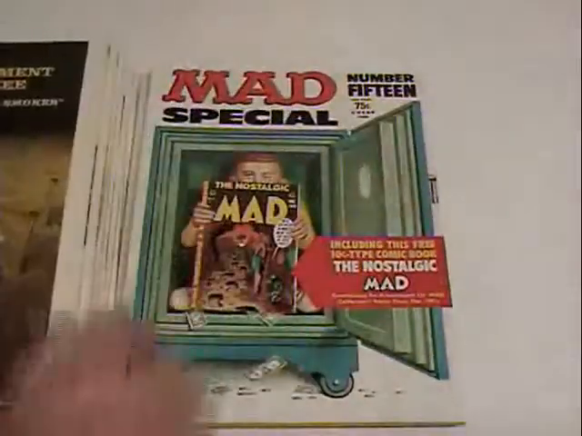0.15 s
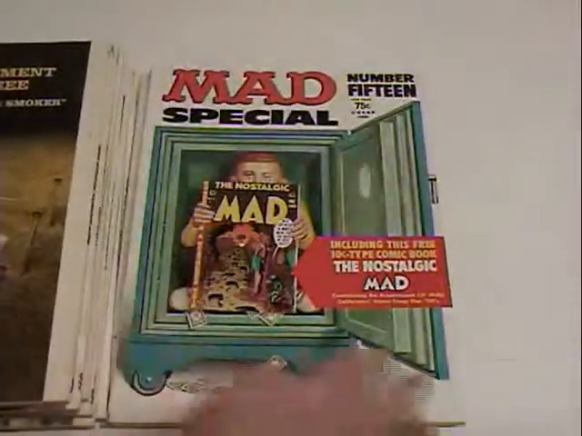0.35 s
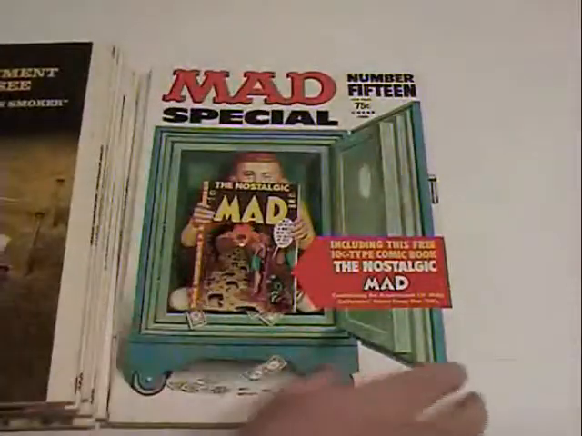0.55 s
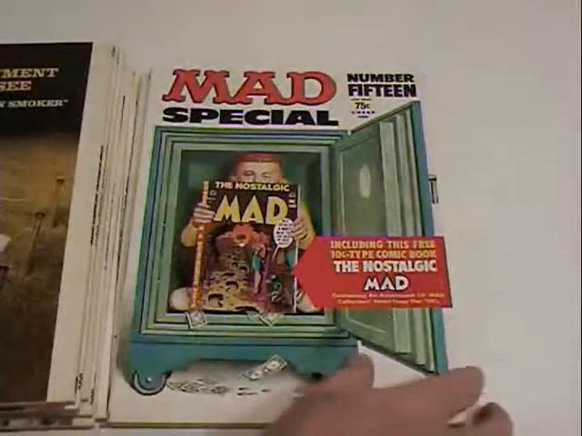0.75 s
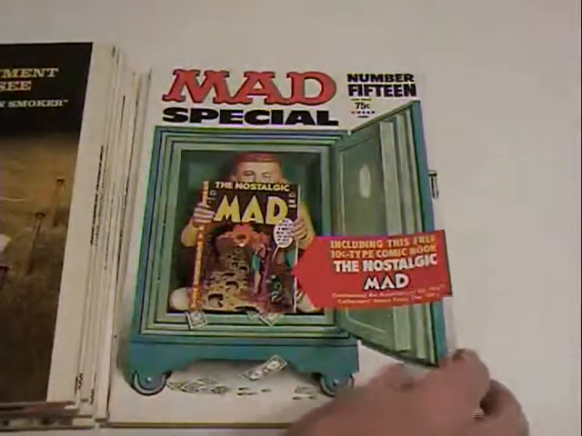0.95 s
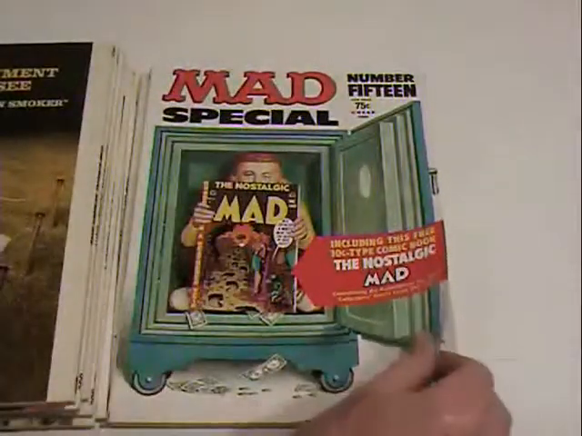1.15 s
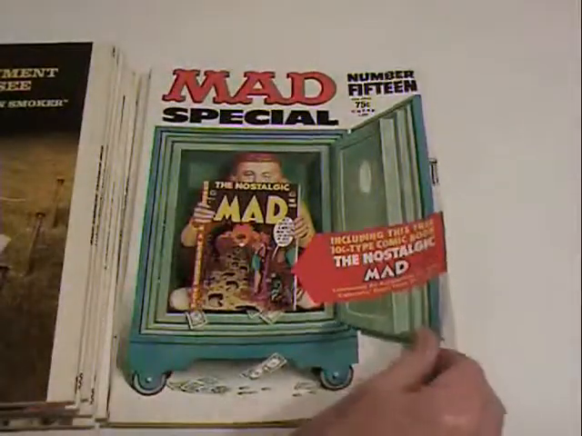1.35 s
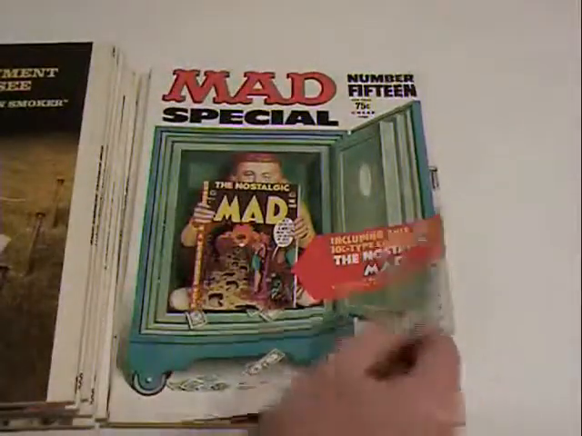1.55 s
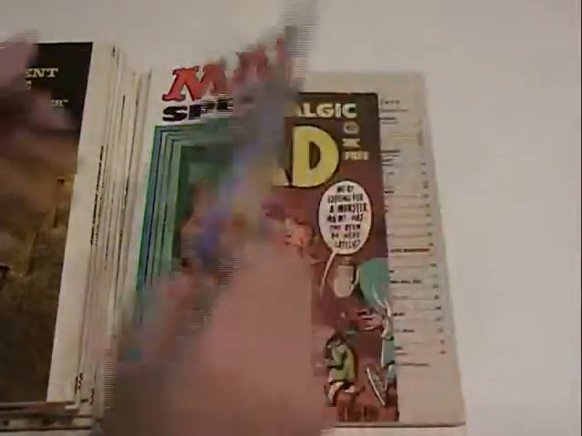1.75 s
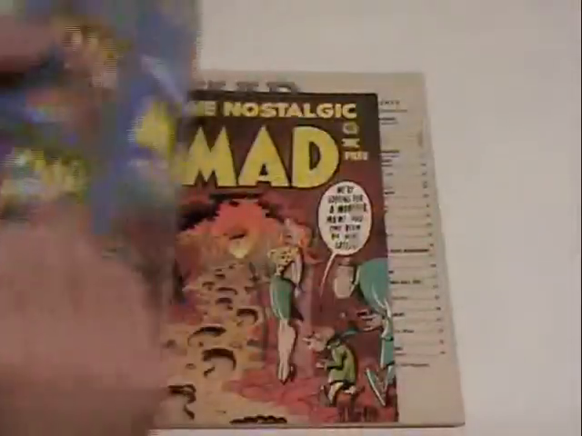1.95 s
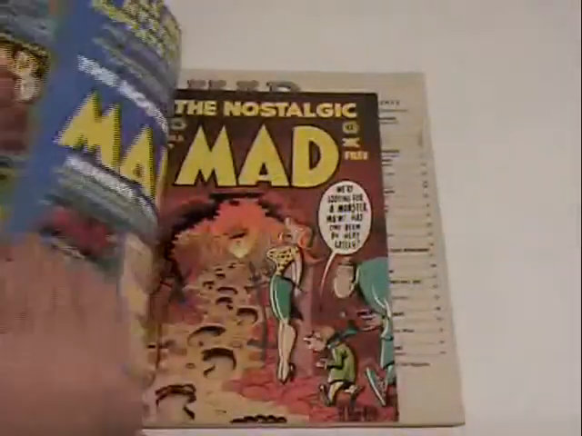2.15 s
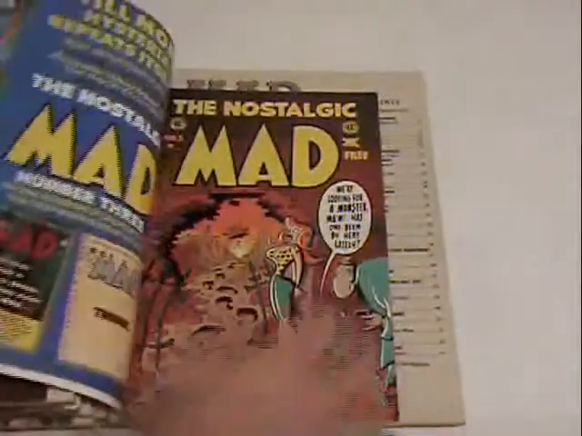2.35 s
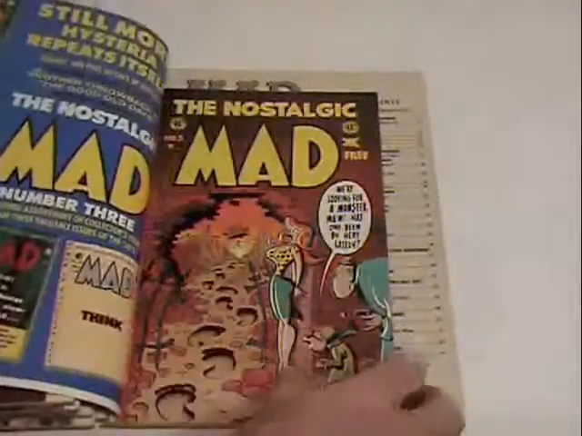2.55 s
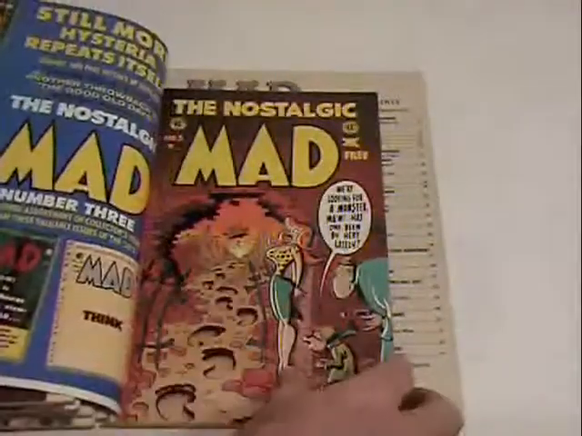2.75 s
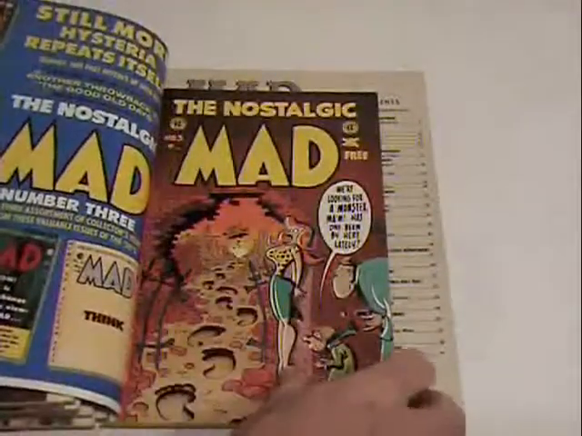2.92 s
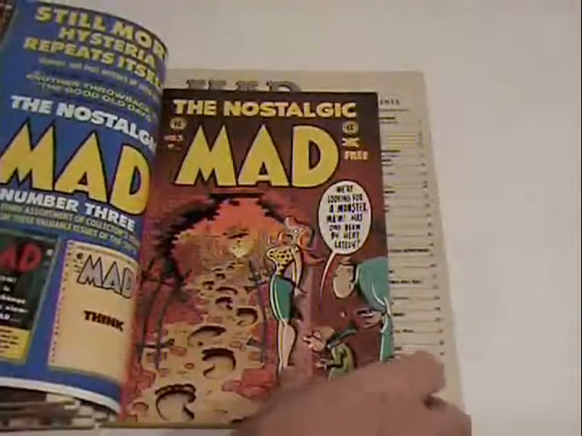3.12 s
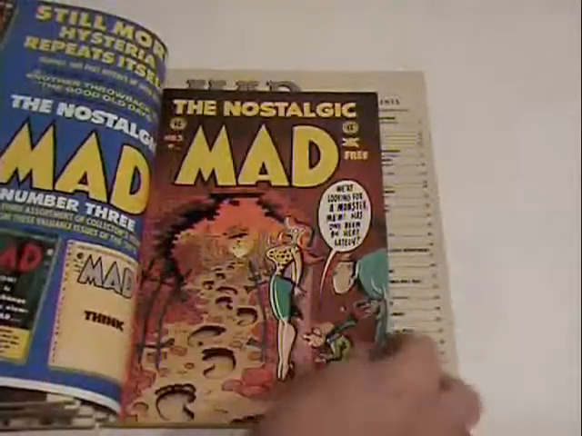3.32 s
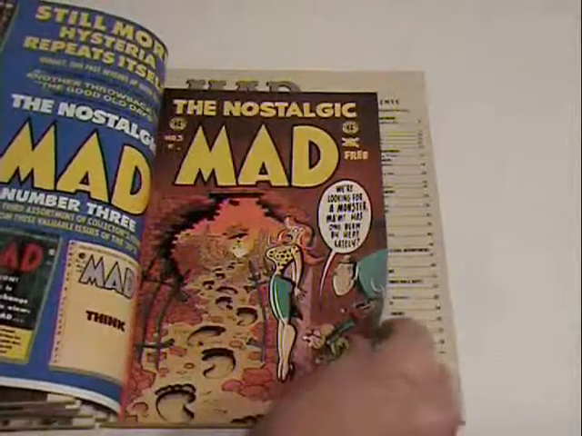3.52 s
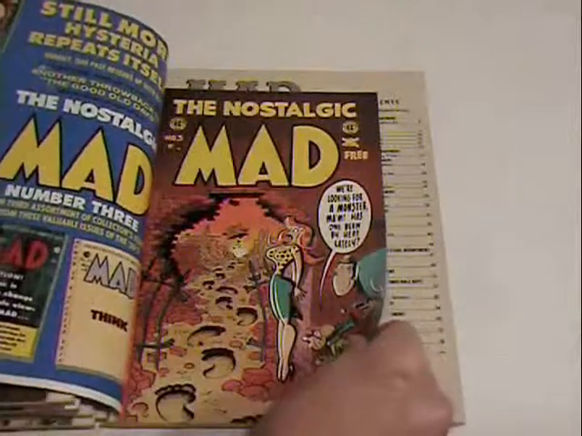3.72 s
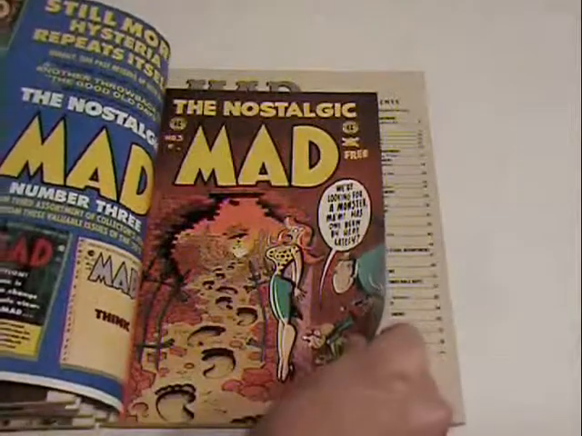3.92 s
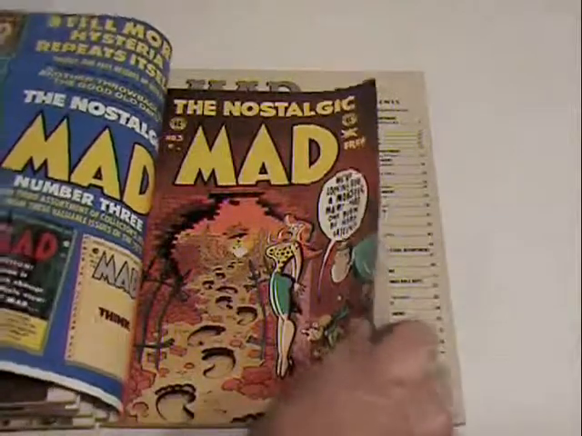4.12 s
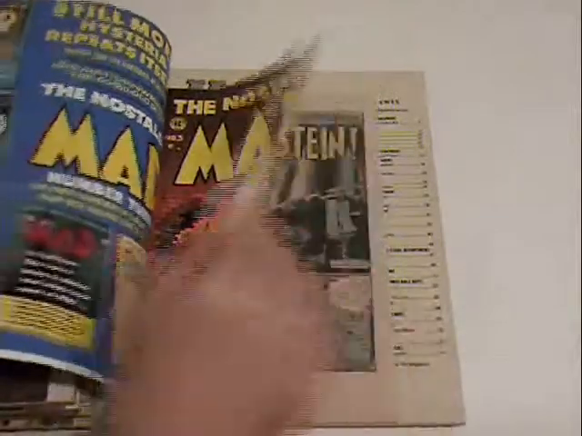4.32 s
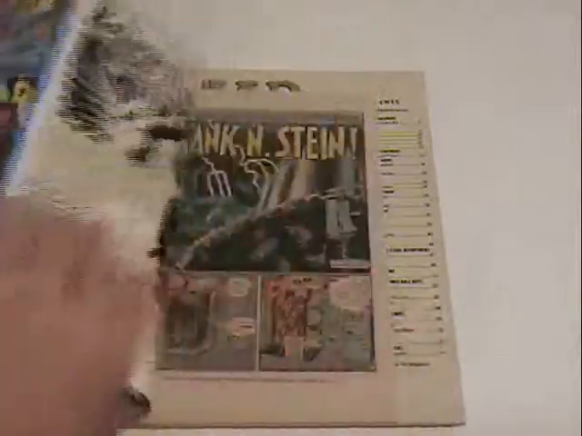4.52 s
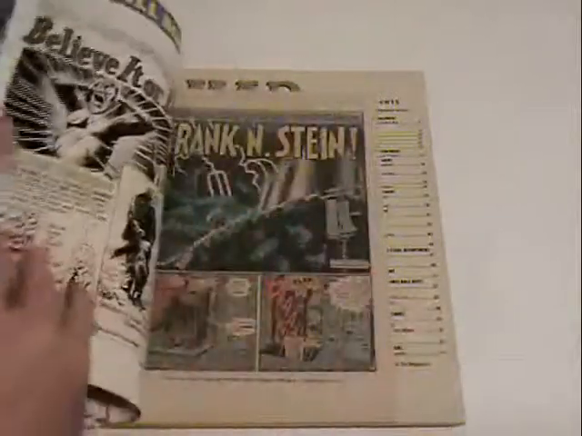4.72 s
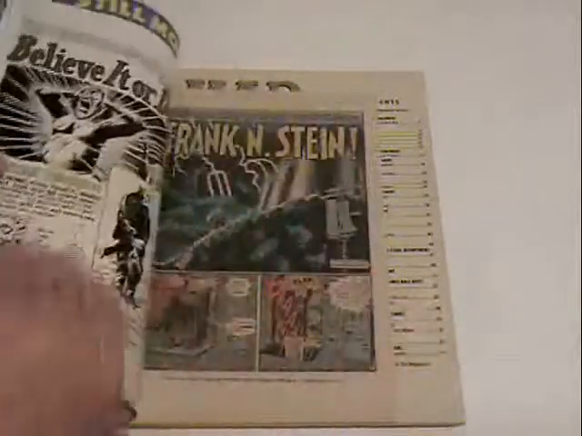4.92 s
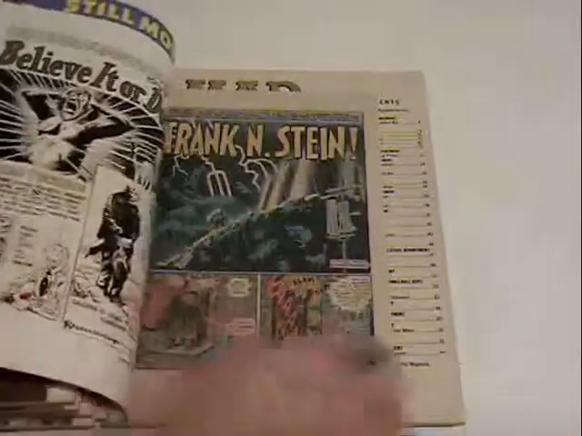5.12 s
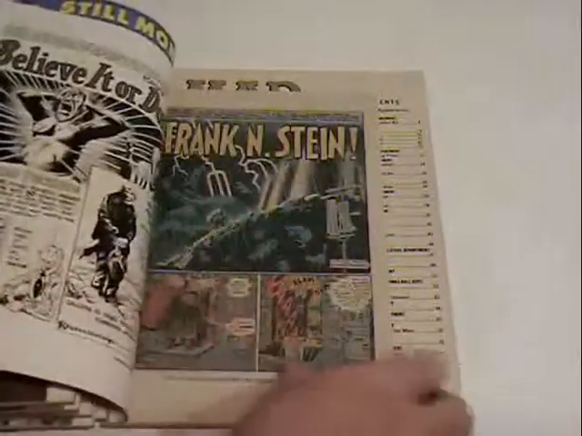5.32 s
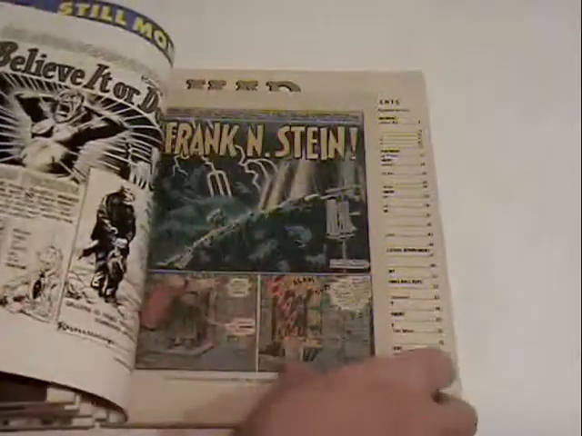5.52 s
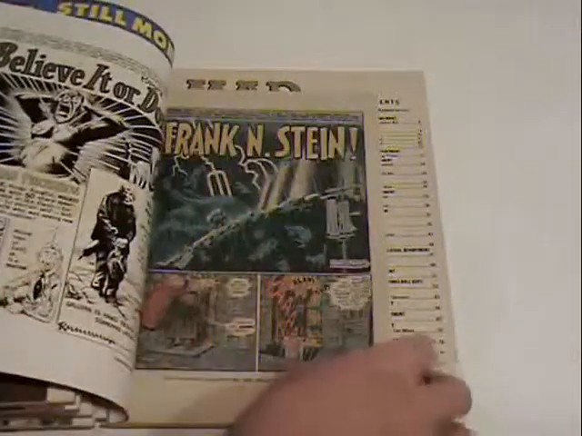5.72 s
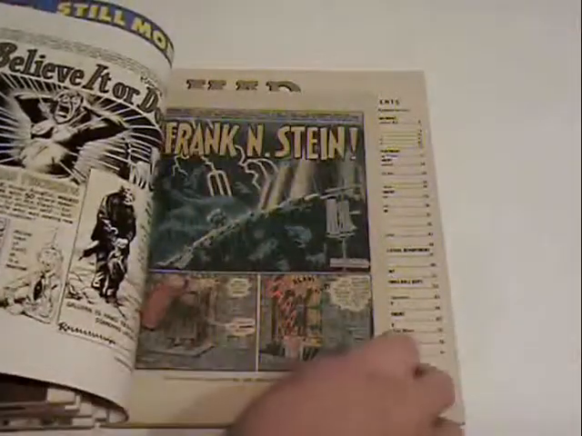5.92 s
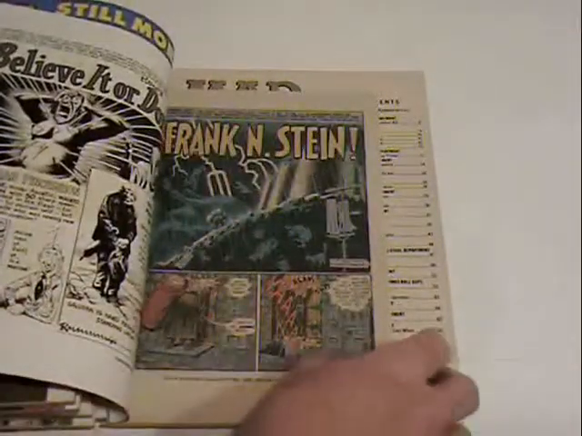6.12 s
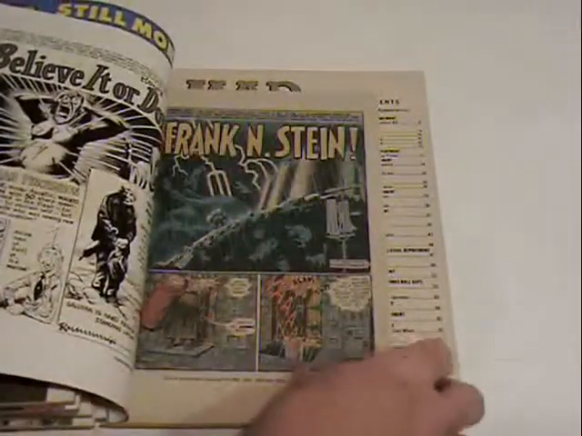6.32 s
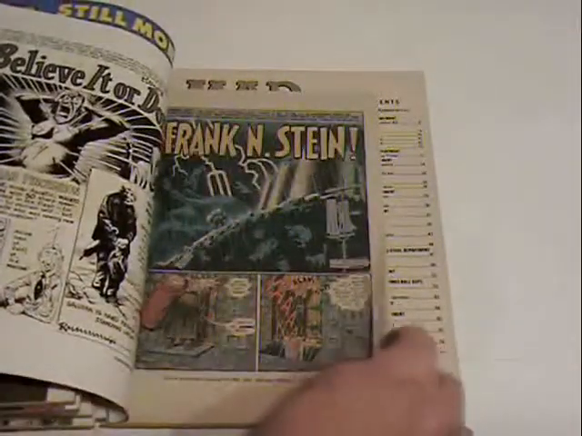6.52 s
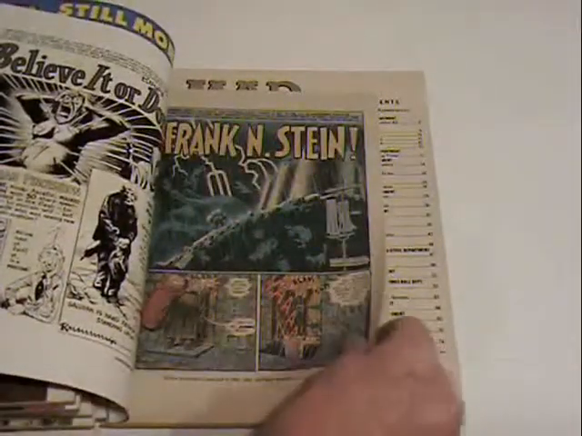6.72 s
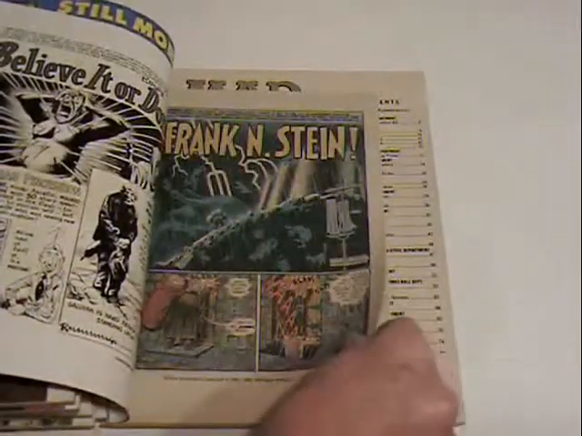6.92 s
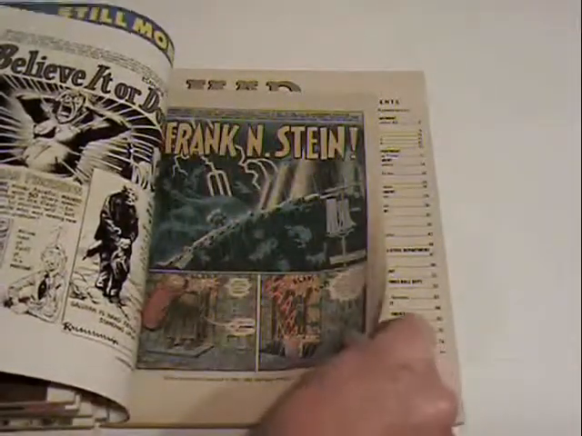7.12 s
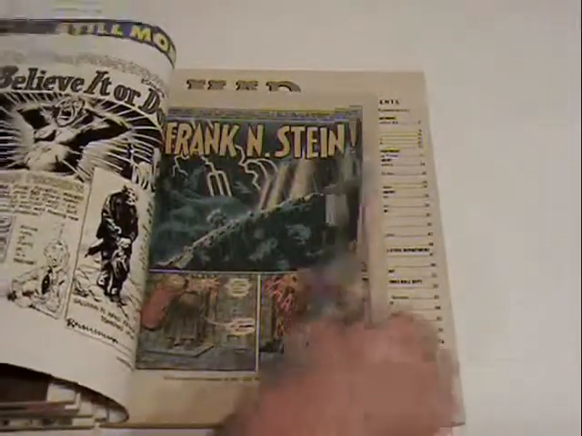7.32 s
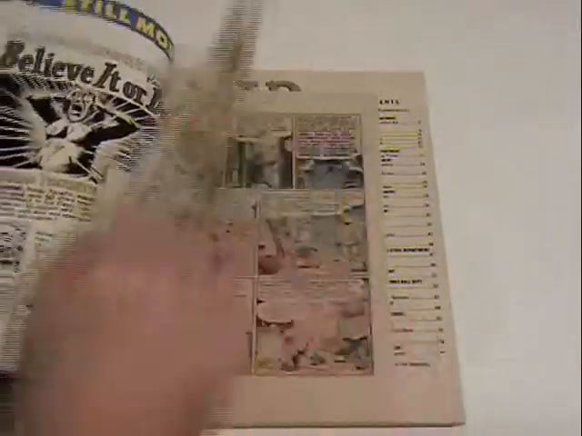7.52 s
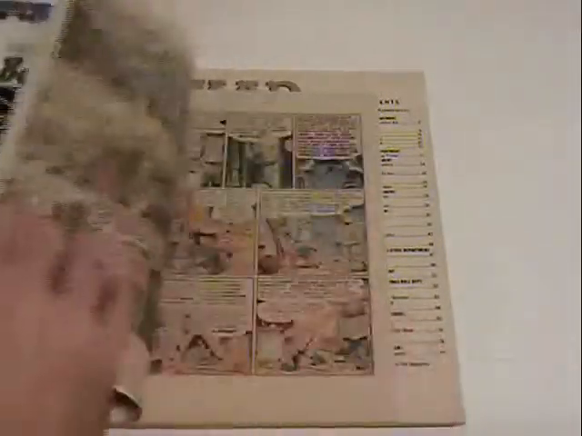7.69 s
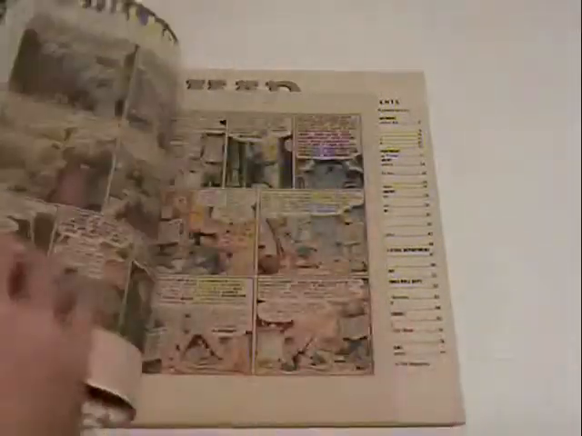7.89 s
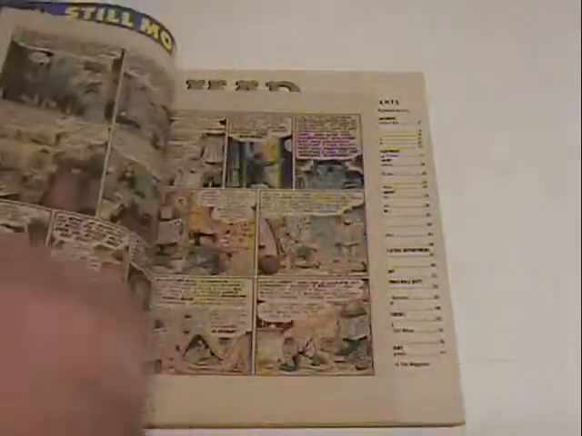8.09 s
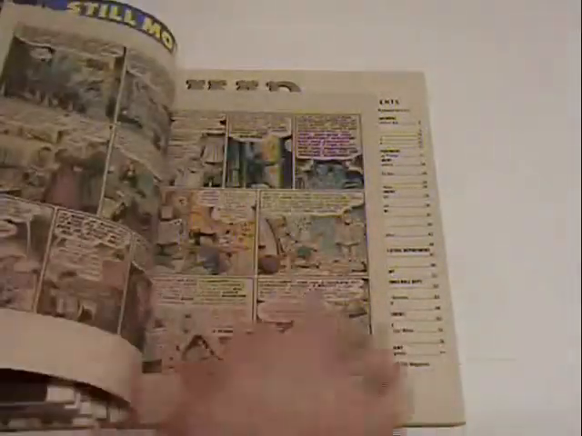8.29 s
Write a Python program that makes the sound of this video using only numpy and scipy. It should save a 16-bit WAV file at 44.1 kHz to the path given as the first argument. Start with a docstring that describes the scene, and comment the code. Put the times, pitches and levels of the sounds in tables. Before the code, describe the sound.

Magazine pages slide, crackle off a thumb and flop over by hand on a table, over room rumble and a faint high whine.

```python
"""A small room: magazine pages are turned by hand on a table, close to a camera with two microphone ports.
Sheets slide and scuff as shaped noise; a page edge slips off the thumb in runs of snaps, each a sharp
push of air with a flutter after it; turned pages flop down in dull puffs, and moved air breathes dully.
Under it lie room rumble, hiss, low hum tones and the camera's own faint whine, pulsed once a frame."""
import sys
import numpy as np
from scipy import signal
from scipy.fft import rfft, irfft, next_fast_len
from scipy.io import wavfile
from scipy.ndimage import uniform_filter1d, map_coordinates

SR = 44100
rng = np.random.default_rng(int(sys.argv[2]) if len(sys.argv) > 2 else 0)


def bounce(signal):
    """Save signal as a 16-bit WAV file at the path given by the first command-line argument."""
    frames = np.transpose(np.atleast_2d(signal))
    limited = np.clip(frames, -1, 1)
    pcm = np.round(limited * 32767).astype(np.int16)
    wavfile.write(sys.argv[1], SR, pcm)


N = 368235


def amp(db):
    """Decibels to gain."""
    return 10 ** (np.asarray(db) / 20)


def unit(x):
    """x at rms 1."""
    return x / np.sqrt(np.mean(x ** 2) + 1e-20)


def along(points, hz):
    """Values of (frequency, value) points, read at hz on a log frequency axis."""
    point_hz, values = np.transpose(points)
    return np.interp(np.log(hz + 1), np.log(point_hz), values)


def filtered(x, response):
    """x times a response of frequency, padded so that the end does not wrap round."""
    n = x.shape[-1]
    padded = next_fast_len(n + 8192)
    spectrum = rfft(x, padded) * response(np.fft.rfftfreq(padded, 1 / SR))
    return irfft(spectrum, padded)[..., :n]


def noise(spectrum, size, shift=1):
    """Noise of rms 1 in a spectrum moved by a frequency ratio."""
    return unit(filtered(rng.standard_normal(size), lambda hz: amp(along(spectrum, hz / shift))))


def wobble(rate):
    """A random curve of straight lines between knots, rate knots a second."""
    knots = rng.standard_normal(int(N * rate / SR) + 4)
    return map_coordinates(knots, [np.arange(N) * rate / SR], order=1)


def resonance(hz, centre, width):
    """Response of one damped mode, 1 at its centre."""
    return 1j * hz * width / (centre ** 2 - hz ** 2 + 1j * hz * width)


def add(track, start_s, sound):
    """Mix a sound into the track from start_s, cut at both ends of the track."""
    start = int(round(start_s * SR))
    part = sound[max(-start, 0):max(N - start, 0)]
    track[max(start, 0):][:len(part)] += part


# rumble and hiss, spectrum shape: freq_hz, level_db (per Hz)
ROOM_NOISE = [(12, -20), (20, 2), (100, -7), (252, -13.5), (298, -13), (362, -16), (881, -23.5),
              (985, -22.5), (1160, -24.5), (1630, -28), (1770, -30.5), (2330, -34), (3000, -33.5),
              (3750, -35.5), (4550, -32), (15500, -39.5)]
# how wide the background lies: freq_hz, side_db (relative to the middle)
ROOM_WIDTH = [(60, -1.5), (110, -2), (200, -3), (380, -2.5), (700, -1.5), (1290, -1.5), (2380, 5.5),
              (4400, 3.5), (8120, 1.5), (15000, 1)]
# steady low hum tones, mains at 60, 120 and 240 Hz, and two others: freq_hz, level_db
HUM_TONES = [(59.9, -61), (120, -74.5), (200, -67), (240, -66.5), (351, -66)]


def background(noise_db=-49.5, hum_db=0):
    """Room rumble, microphone hiss and low hum tones whose phases drift slightly."""
    t = np.arange(N) / SR
    mid = noise(ROOM_NOISE, N)
    side = filtered(noise(ROOM_NOISE, N), lambda hz: amp(along(ROOM_WIDTH, hz)))
    hum = np.zeros(N)
    for hz, level_db in HUM_TONES:
        hum += amp(level_db + hum_db) * np.sqrt(2) * np.sin(2 * np.pi * hz * t + .5 * wobble(3))
    return amp(noise_db) * np.array([mid + side, mid - side]) + hum


FRAME_HZ = 29.97
# the whine fades briefly: time_s (of the deepest point), change_db
WHINE_DIPS = [(.92, -9), (2.0, -8), (4.72, -2)]


def whine(whine_hz=3777, level_db=-51.5, duty=0.3, drift_db=0.5, left_db=1.7, dip_s=.11):
    """The camera's electronics sing for part of every frame, stronger on the left and fading now and then."""
    t = np.arange(N) / SR
    frame_cycle = np.cos(2 * np.pi * FRAME_HZ * (t - .021))
    gate = np.clip(.5 + frame_cycle - np.cos(np.pi * duty), 0, 1)
    fade_db = sum(db * np.exp(-((t - s) / dip_s) ** 2) for s, db in WHINE_DIPS)
    balance = amp([[left_db], [-left_db]])
    strength = amp(level_db + fade_db + drift_db * wobble(4)) * balance
    return strength * gate * np.sin(2 * np.pi * whine_hz * t + .5 * wobble(20))


# decay of the room's answer: freq_hz, t60_s
WALLS = [(150, 0.29), (1000, 0.13), (4000, 0.1), (14000, 0.017)]


def room(x, wet_db=-13, delay_s=0.0037):
    """The walls answer with a noise tail after a short delay, the treble dying first."""
    hz, t, bands = signal.stft(rng.standard_normal(SR // 3), SR, nperseg=256)
    decay = amp(-60 * t / along(WALLS, hz)[:, None])
    tail = signal.istft(bands * decay, SR, nperseg=256)[1]
    tail = np.pad(tail / np.linalg.norm(tail), (int(delay_s * SR), 0))
    return x + amp(wet_db) * signal.fftconvolve(x, tail)[:N]


# how wide the paper lies: freq_hz, side_db (relative to the middle)
WIDTH = [(200, -20), (1000, -25), (2200, -35), (4000, -15.5), (8000, -2.5), (14000, -6)]


def ports(x):
    """Sound leaves ever new spots of the sheet: two close ports agree in the middle range, part in the treble."""
    spot = unit(wobble(500))
    side = filtered(x * spot, lambda hz: amp(along(WIDTH, hz)))
    return np.array([x + side, x - side])


# stirred air, spectrum shape: freq_hz, level_db (per Hz)
AIR = [(100, -13), (250, 3.5), (450, -2.5), (750, 1), (1100, -5), (1700, -3.5), (4000, -26)]
# dull breaths of air, the first under a run of snaps, the others as the broad page swings:
# peak_s, level_db, half_length_s
BREATHS = [(1.444, -44, 0.046), (1.8, -62, 0.13), (2.2, -47, 0.063), (4.5, -53.5, 0.36),
           (7.514, -49.5, 0.26), (8.06, -47.5, 0.15)]


def stirred_air(air_db=0, draught_db=-65):
    """Moved air gives dull breaths of noise that rise and fall, over a faint steady stir."""
    t = np.arange(N) / SR
    power = amp(draught_db) ** 2
    for peak_s, level_db, half_s in BREATHS:
        power = power + amp(level_db) ** 2 * np.exp(-2 * ((t - peak_s) / half_s) ** 2)
    return np.sqrt(power) * amp(air_db + 4.6 * wobble(30)) * noise(AIR, N)


# soft landings of sheets and hand: start_s, level_db (before its decay), centre_hz, t60_s
FLOPS = [(1.905, -30.5, 640, 0.1), (2.113, -30, 905, 0.053), (2.115, -32.5, 125, 0.22),
         (2.129, -31.5, 560, 0.13), (2.157, -41, 200, 0.19), (2.24, -27, 860, 0.12),
         (2.243, -35.5, 240, 0.32), (2.586, -42, 447, 0.096), (2.705, -41.5, 510, 0.094),
         (3.09, -46, 930, 0.32), (4.58, -37.5, 795, 0.062), (4.796, -42.5, 1070, 0.21),
         (5.002, -25.5, 980, 0.041), (5.485, -45.5, 1240, 0.23), (5.655, -51, 750, 0.083),
         (5.855, -46, 845, 0.07), (6.26, -48, 1290, 0.18), (6.36, -41.5, 534, 0.046),
         (7.39, -35, 1010, 0.086), (7.439, -30, 900, 0.047), (7.622, -32, 790, 0.078),
         (7.624, -36, 201, 0.061), (7.818, -32.5, 189, 0.07)]


def flops(level_db=0, attack_s=0.00038, breadth=1.2, pile_hz=205, pile_width_hz=70, pile_db=4.5):
    """A landing sheet squeezes out a dull puff of air and thumps the pile under it."""
    out, t = np.zeros(N), np.arange(SR // 4) / SR
    for start_s, db, centre, t60 in FLOPS:
        puff = unit(filtered(rng.standard_normal(len(t)),
                             lambda hz: resonance(hz, centre, breadth * centre) ** 2))
        decay = amp(db + level_db - 60 * t / t60)
        add(out, start_s, decay * (1 - np.exp(-t / attack_s)) * puff)
    return filtered(out, lambda hz: 1 + (amp(pile_db) - 1) * resonance(hz, pile_hz, pile_width_hz))


# a sliding sheet, spectrum shape: freq_hz, level_db (per Hz)
SHEET = [(120, -28), (250, -14), (500, -12), (850, -10.5), (1200, -1.5), (1700, 0), (2200, 0.5),
         (2900, -1.5), (4000, -5.5), (5000, -7.5), (6000, -13), (8000, -17), (15000, -33.5)]
# hiss of rubbed fibres, spectrum shape: freq_hz, level_db (per Hz)
FRICTION = [(1500, -27), (3500, 2), (6000, -4.5), (8000, -3.5), (11000, -9), (13500, -7), (16000, -9.5)]
# paper slides on paper or skin, before the slide's trims:
# start_s, length_s, sheet_db (halfway), swell_db (from start to end), hiss_db (relative to the sheet)
SLIDES = [(0.0, 0.46, -53.5, 0, -19), (0.489, 0.26, -55, -3, 1.5), (0.981, 0.2, -48.5, 13, 2),
          (1.186, 0.098, -46, 7, -2.5), (1.391, 0.46, -44.5, -6.5, -13), (2.139, .1, -42, -1, -1.5),
          (2.25, .32, -57, -5, -17), (2.73, 0.59, -58, 2.5, 0), (3.33, 0.19, -47.5, -8, 1),
          (3.568, 0.077, -51, 6, -7), (3.693, 0.26, -46.5, -5, -6), (3.965, 0.19, -43, 12.5, -5),
          (4.162, 0.099, -39.5, -2, -2), (4.28, 0.24, -46, -0.5, -6.5), (4.542, 0.24, -47.5, -13, -4),
          (4.758, 0.079, -44.5, 2.5, -8), (4.942, 0.083, -49.5, 8, 1.5), (5.047, 0.44, -56.5, -2, -10),
          (5.448, 0.26, -58.5, -1, 1), (5.776, 0.086, -51, -6, 5), (5.946, .08, -54.5, -5, 10),
          (6.113, .37, -60, 6, 5.5), (6.637, 0.15, -47.5, 11, -3.5), (6.822, 0.13, -49.5, 11, -8),
          (6.977, 0.305, -39.5, 12, -4.5), (7.29, 0.1, -37.5, 2.5, 0.5), (7.429, 0.19, -40, 0.5, -8.5),
          (7.636, 0.28, -48.5, 8, -10), (7.943, .19, -38, 4, -1), (8.145, 0.095, -47.5, -4, -6)]


def slide(sheet_db=-1.4, hiss_db=0.45, grain_db=2.0, attack_s=0.016, release_s=0.018, rest_db=-59.5,
          pressure_db=0.8):
    """A slide takes hold, swells or eases, and dies away; sheet and fibres sound with the uneven grip."""
    t = np.arange(N) / SR
    # powers; the resting hand never lies quite still
    sheet_power, hiss_power = np.full((2, N), amp(rest_db) ** 2)
    for start, length, db, swell_db, fibres_db in SLIDES:
        progress = np.clip((t - start) / length, 0, 1)
        hold = np.clip((t - start) / attack_s, 0, 1)
        release = np.exp(-np.clip(t - start - length, 0, 1) / release_s)
        power = (hold * release * amp(db + swell_db * (progress - .5))) ** 2
        sheet_power += power
        hiss_power += power * amp(fibres_db) ** 2
    grip = unit(amp(pressure_db * wobble(24) + wobble(110) + grain_db * wobble(1500)))
    sheet = amp(sheet_db) * np.sqrt(sheet_power) * noise(SHEET, N)
    hiss = amp(hiss_db) * np.sqrt(hiss_power) * noise(FRICTION, N)
    return grip * (sheet + hiss)


def flexing(x, depth_db=1.5):
    """As the sheet bends, its resonances wander and lift ever new bands."""
    bands = signal.stft(x, nperseg=512)[2]
    field = uniform_filter1d(rng.standard_normal(bands.shape), size=5, axis=0)  # smooth over frequency
    field = uniform_filter1d(field, size=12, axis=1)  # and over time
    return signal.istft(bands * amp(depth_db * unit(field)), nperseg=512)[1][:N]


# a quick stroke, spectrum shape before its shift in pitch: freq_hz, level_db (per Hz)
SCUFF = [(100, -17), (400, -13), (850, -6.5), (1300, -4.5), (2100, 3), (3000, -4.5), (4200, -16),
         (7000, -36), (16000, -56)]
# short swelling strokes, before the trims in scuffs:
# peak_s, sheet_db, hiss_db (relative to the sheet), centre_hz, rise_s
STROKES = [(0.115, -45, -3.5, 2200, 0.045), (1.167, -41.5, -4, 2200, 0.011),
           (1.275, -42.5, -13, 2020, 0.017), (1.585, -46.5, 1, 2200, .015), (1.815, -50.5, 1, 2400, 0.016),
           (2.159, -38.5, -14, 2010, .003), (2.231, -32, -3, 2970, 0.0079),
           (3.277, -41.5, 4.5, 2820, .0036), (3.3625, -27.5, -5, 2460, 0.0074),
           (3.495, -45.5, 0, 2400, 0.076), (4.946, -41.5, -5.5, 3280, 0.032),
           (4.982, -27.5, -11.5, 3750, 0.0047), (4.988, -32.5, -14, 1900, 0.0019),
           (5.655, -51, 3, 2030, .02), (5.943, -39.5, 0.5, 2580, .005), (5.977, -36.5, -12, 2710, 0.015),
           (5.997, -37.5, 6.5, 2900, 0.015), (6.267, -46, -2, 1440, 0.019), (6.344, -42, 0.5, 3330, 0.017),
           (6.445, -39.5, 0.5, 1810, 0.0058), (6.838, -39.5, -1, 2200, 0.0023),
           (6.868, -39, -1, 2200, 0.0066), (6.886, -38, -1, 2200, 0.0022), (6.931, -40, -4, 2210, .006),
           (7.443, -32, -15, 2310, 0.0022), (7.537, -28.5, -29, 3300, 0.0053),
           (7.598, -32.5, 0.5, 2400, 0.0091), (7.87, -32.5, -28, 2300, 0.0045),
           (8.075, -27.5, -2, 2700, 0.005), (8.097, -32, -1, 1590, 0.0048)]


def scuffs(gain_db=2.5, fibre_db=-1, stop_s=0.0072, sheet_hz=2100):
    """A stroke swells as the sheet speeds up and stops when its edge runs free."""
    out, t = np.zeros(N), np.arange(-SR // 8, SR // 16) / SR
    for peak_s, db, hiss_db, centre, rise_s in STROKES:
        swell = np.exp(np.minimum(t, 0) / rise_s - (np.maximum(t, 0) / stop_s) ** 2)
        sheet = noise(SCUFF, len(t), centre / sheet_hz)
        hiss = amp(hiss_db + fibre_db) * noise(FRICTION, len(t))
        add(out, peak_s + t[0], amp(db + gain_db) * swell * (sheet + hiss))
    return out


CRACKLE_FALL_DB = 1.2  # each slip of a run is cleaner than the last
# a page edge slips off the thumb, each slip harder until the grip is at its limit:
# [slip times_s], first_db, growth_db (per slip), limit_db, pitch_hz, crackle_db (of the first slip)
SLIP_RUNS = [([1.3438, 1.378, 1.4119, 1.4366, 1.4594, 1.481], -22, 3.5, -16, 1870, -13),
             ([3.764, 3.795, 3.820, 3.8492, 3.887, 3.9236, 3.9766, 4.024, 4.062, 4.0923, 4.116],
             -23, 2.04, -5, 2240, -10)]


def slips():
    """The snaps of every run off the thumb, as (time_s, push_db, pitch_hz, crackle_db)."""
    run_snaps = []
    for times, first_db, growth_db, limit_db, pitch, crackle_db in SLIP_RUNS:
        for k, s in enumerate(times):
            push_db = min(first_db + growth_db * k, limit_db)
            run_snaps.append((s, push_db, pitch, crackle_db - CRACKLE_FALL_DB * k))
    return run_snaps


# a jolted sheet, spectrum shape before its shift in pitch: freq_hz, level_db (per Hz)
FLUTTER = [(60, -48), (220, -1), (500, -4), (850, -4), (1300, 3), (2100, 2), (2900, -5), (3700, 1),
           (5500, -10.5), (9000, -19), (16000, -62)]
# single snaps as the page buckles: time_s, push_db, pitch_hz, crackle_db (relative, before a trim)
SNAPS = [(2.114, -28, 1300, -4.5), (2.594, -44.5, 3000, 4.5), (3.154, -41.5, 4000, 4),
         (3.262, -29.5, 2580, -0.5), (3.3634, -15, 2270, -9), (3.704, -27.5, 2280, -5),
         (6.635, -27.5, 3000, -5.5), (6.832, -26.5, 2200, -11), (6.883, -25, 2200, -20),
         (7.4397, -19, 1650, -22), (7.8695, -27, 2400, -34), (7.958, -28, 2400, -17),
         (8.004, -23.5, 1480, -25), (8.0704, -13.5, 1780, -12), (8.124, -5, 3440, -14.5)]


def snaps(flutter_db=-18, crackle_db=-7, flutter_s=0.0085, ring_db=-27, ring_t60=0.14, sheet_hz=2100):
    """Each snap is one sharp push of air, then bending waves run through the sheet; gives (pushes, flutter)."""
    pushes, flutter = np.zeros(N), np.zeros(N)
    t = np.arange(-SR // 500, SR // 8) / SR
    burst = (t > 0) * np.exp(-(t / flutter_s) ** 4)
    ring = (t > 0) * amp(ring_db - 60 * t / ring_t60)
    crackle_shape = 0.75 * burst + 2.34 * np.exp(-(t / 0.00027) ** 2)  # a spike on the push, then a burst
    for s, db, pitch, crackle in slips() + SNAPS:
        cycles = t * pitch
        push = np.cos(2 * np.pi * cycles) / (1 + cycles ** 2) ** 3
        fibres = amp(crackle + crackle_db) * noise(FRICTION, len(t)) * crackle_shape
        add(pushes, s + t[0], amp(db) * (push + fibres))
        reach = sheet_hz / pitch  # a slower, broader slip moves more of the sheet
        waves = noise(FLUTTER, len(t), np.sqrt(pitch / sheet_hz))
        add(flutter, s + t[0], amp(db) * reach * (amp(flutter_db) * burst + ring) * waves)
    return pushes, flutter


# resonances of the sheet: centre_hz, width_hz, lift_db
PAPER_MODES = [(1110, 92, 1.5), (1870, 36, 2.5), (1920, 16, 4), (2170, 78, 1.5), (2418, 78, -3.5),
               (2750, 15, 2), (3440, 250, -2.5)]


def paper_modes(hz):
    """Response of the sheet, whose modes lift or sink narrow bands."""
    return 1 + sum((amp(db) - 1) * resonance(hz, centre, width) for centre, width, db in PAPER_MODES)


def scene():
    """Slides, scuffs and flutter carry the sheet's modes; pushes of air, flops and stirred air do not."""
    pushes, flutter = snaps()
    sheet = filtered(flexing(slide()) + scuffs() + flutter, paper_modes)
    paper = pushes + amp(-1.5) * sheet + flops() + stirred_air()
    return ports(room(paper)) + background() + whine()


TOP_HZ = 15900


def record(dry):
    """The camera keeps next to nothing above its band limit, a very steep low-pass."""
    return filtered(dry, lambda hz: 1 / np.sqrt(1 + (hz / TOP_HZ) ** 200))


dry = scene()
out = record(dry)
bounce(out)
```